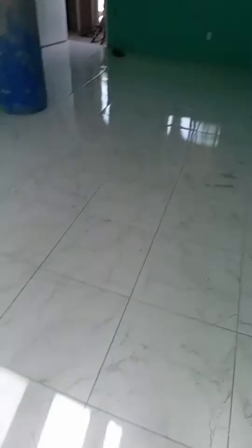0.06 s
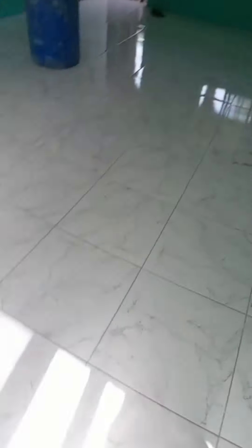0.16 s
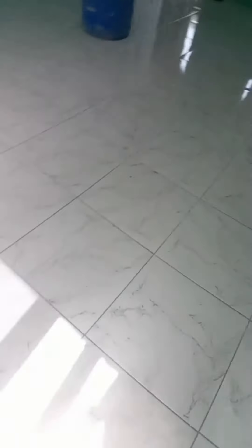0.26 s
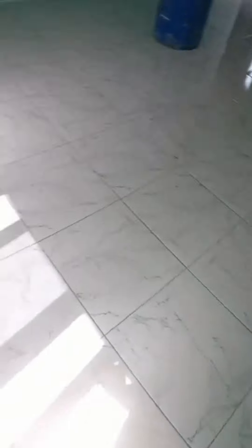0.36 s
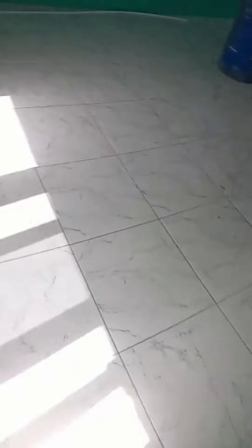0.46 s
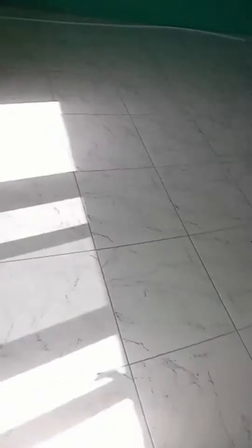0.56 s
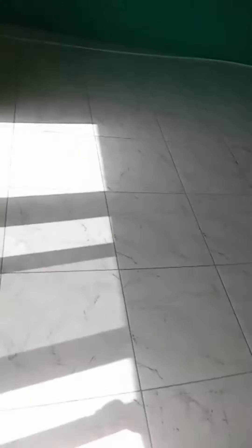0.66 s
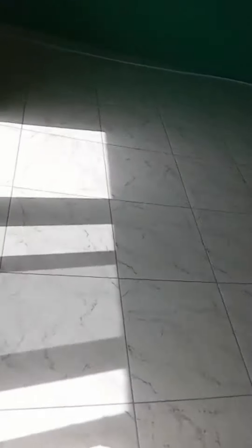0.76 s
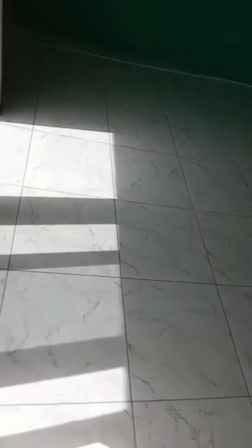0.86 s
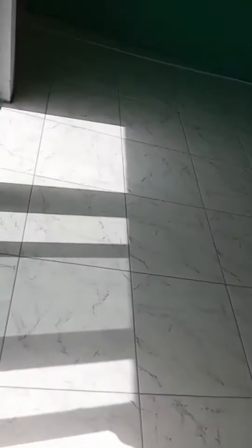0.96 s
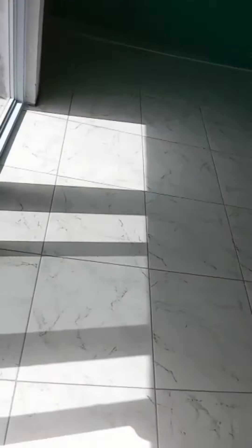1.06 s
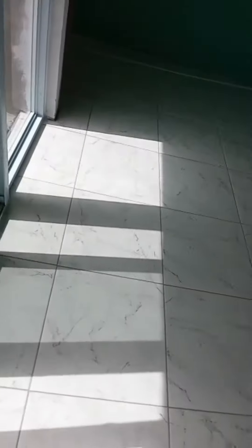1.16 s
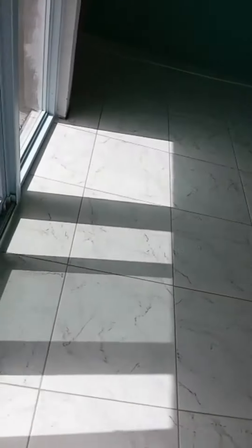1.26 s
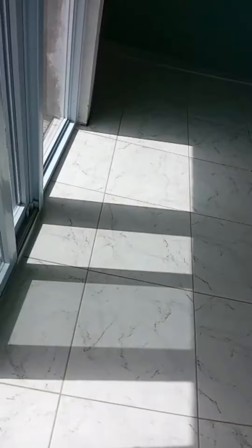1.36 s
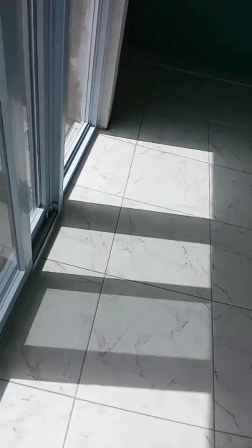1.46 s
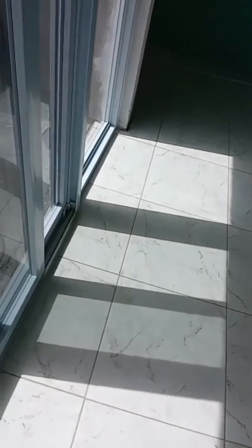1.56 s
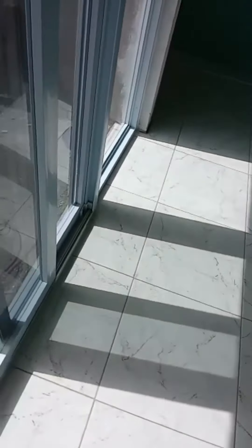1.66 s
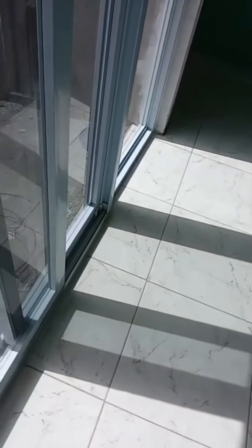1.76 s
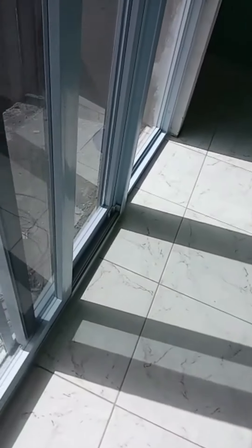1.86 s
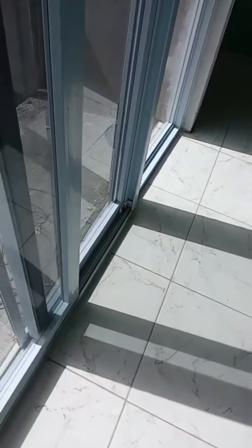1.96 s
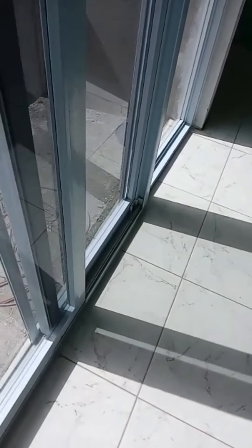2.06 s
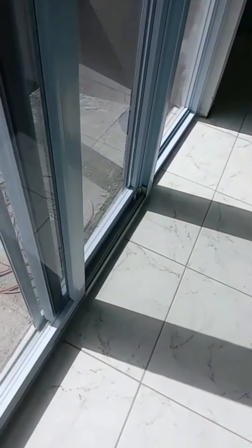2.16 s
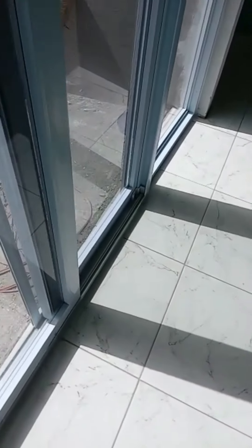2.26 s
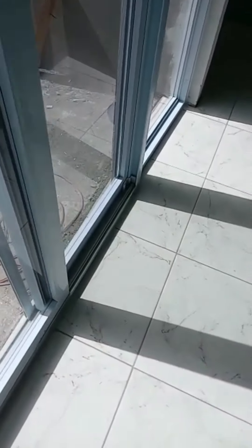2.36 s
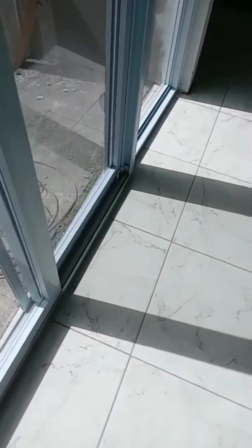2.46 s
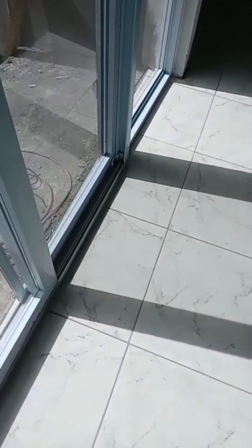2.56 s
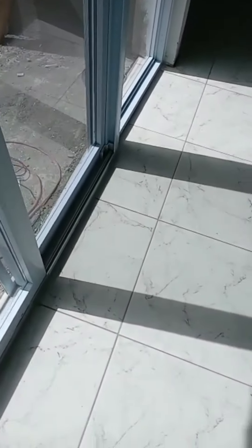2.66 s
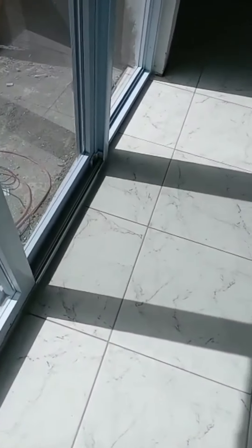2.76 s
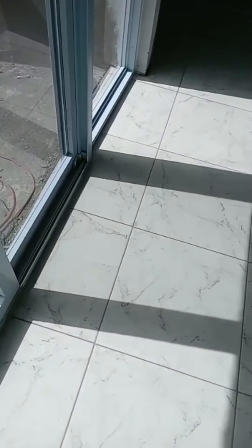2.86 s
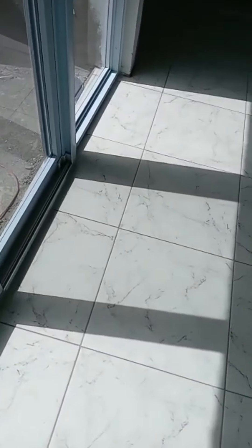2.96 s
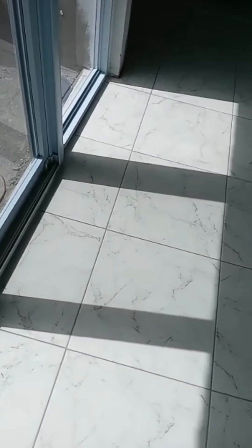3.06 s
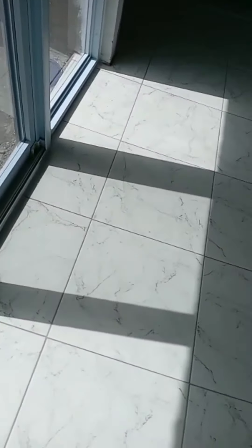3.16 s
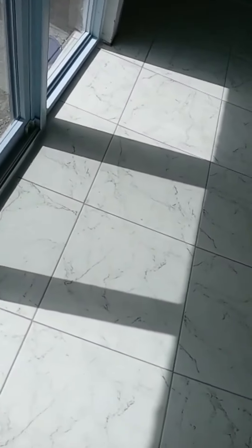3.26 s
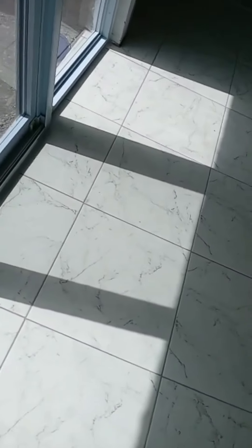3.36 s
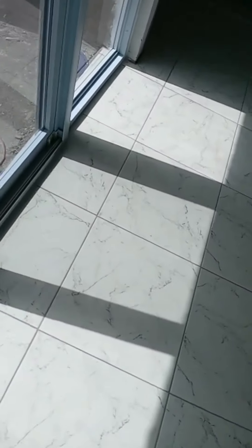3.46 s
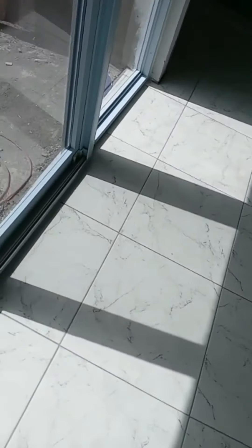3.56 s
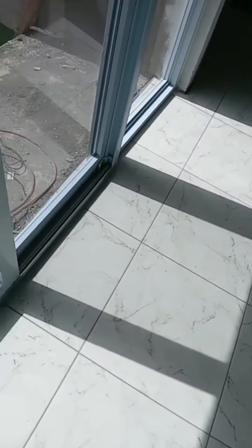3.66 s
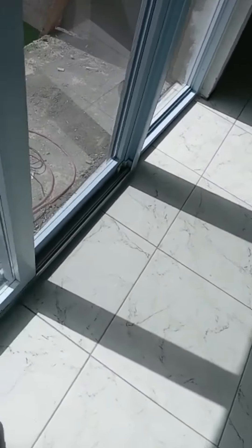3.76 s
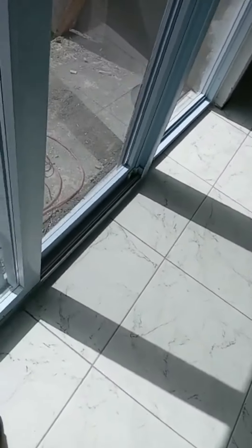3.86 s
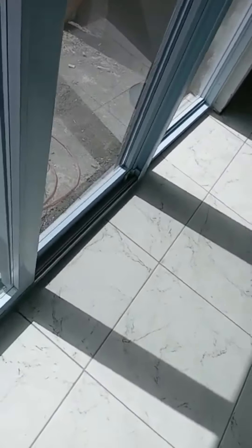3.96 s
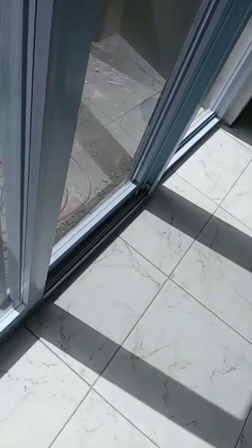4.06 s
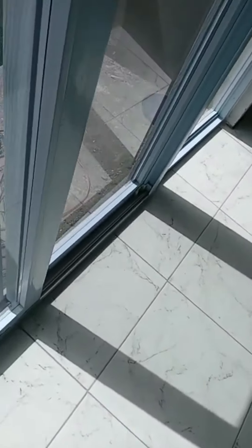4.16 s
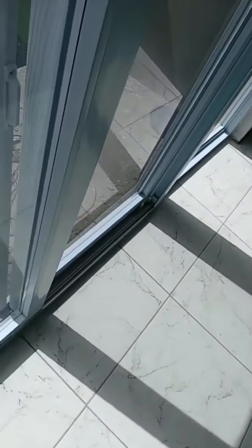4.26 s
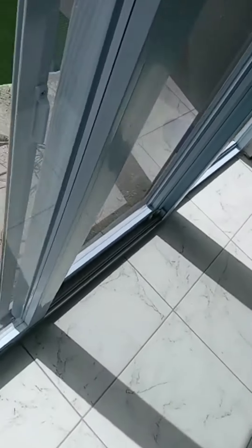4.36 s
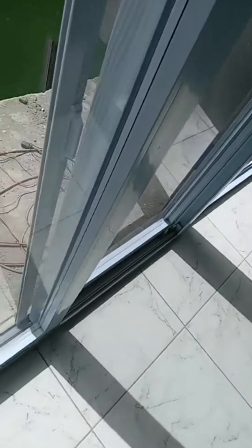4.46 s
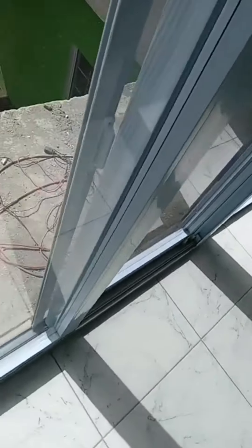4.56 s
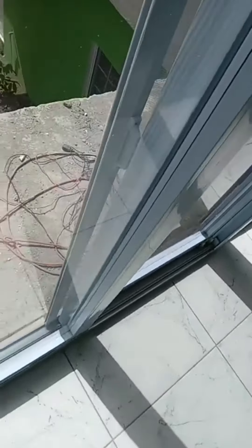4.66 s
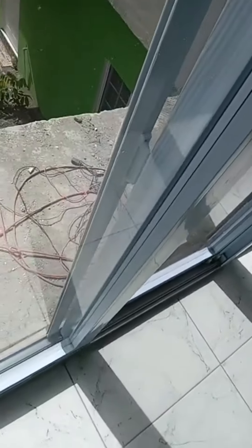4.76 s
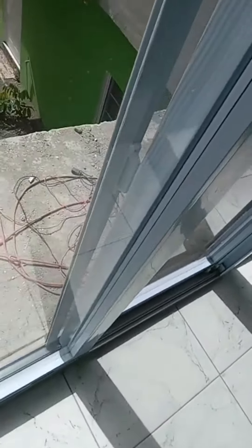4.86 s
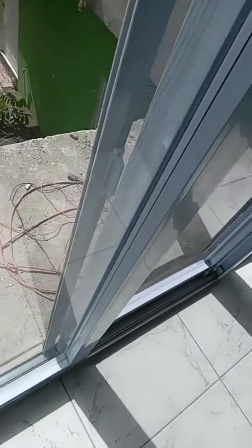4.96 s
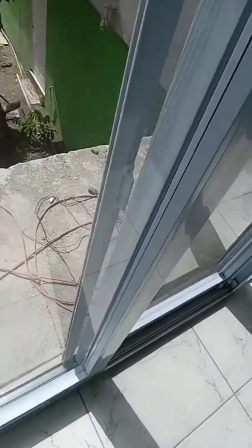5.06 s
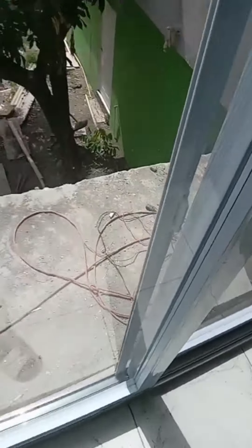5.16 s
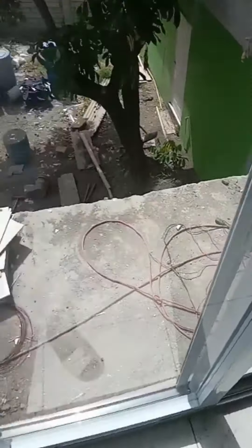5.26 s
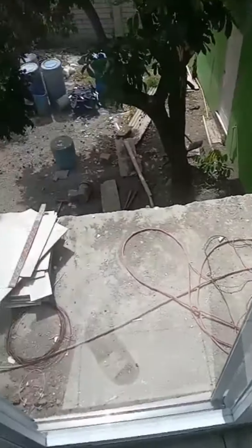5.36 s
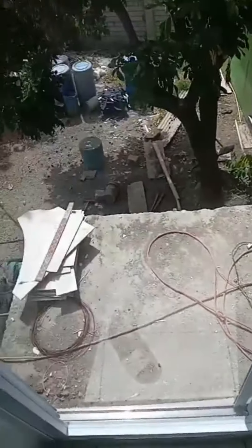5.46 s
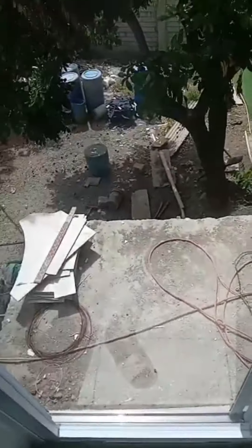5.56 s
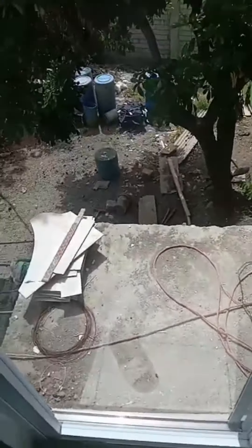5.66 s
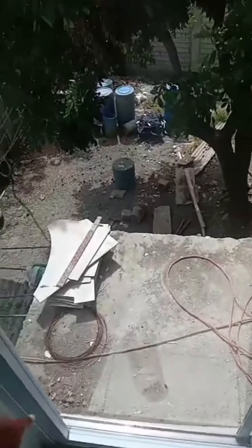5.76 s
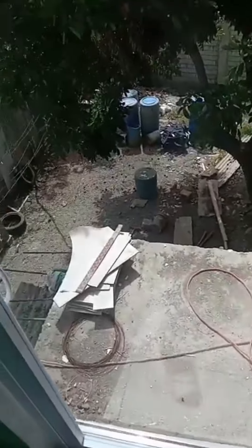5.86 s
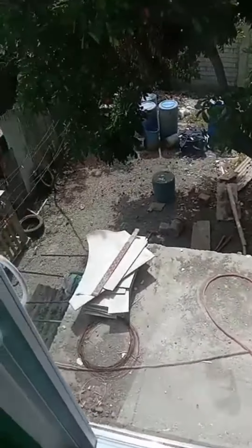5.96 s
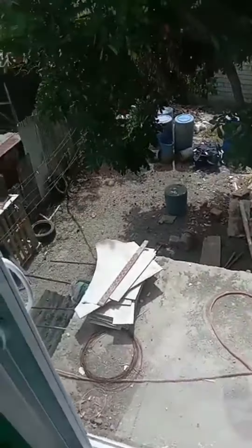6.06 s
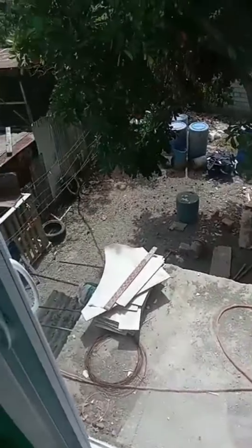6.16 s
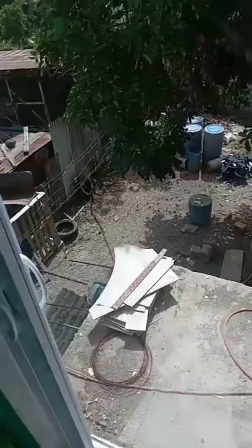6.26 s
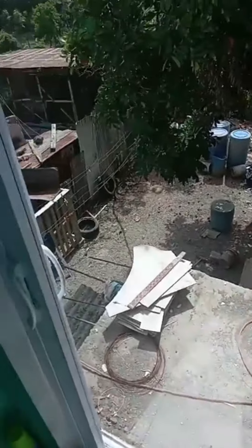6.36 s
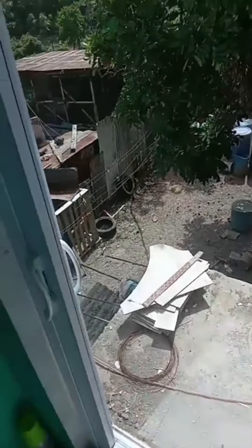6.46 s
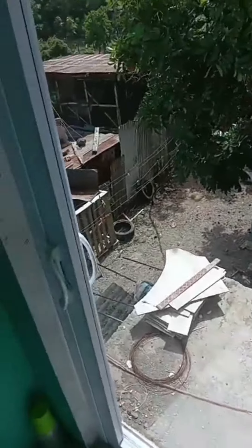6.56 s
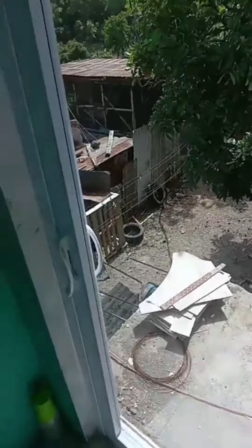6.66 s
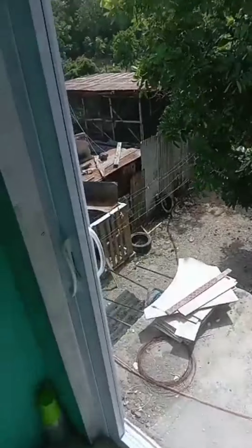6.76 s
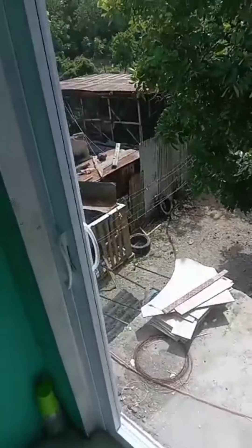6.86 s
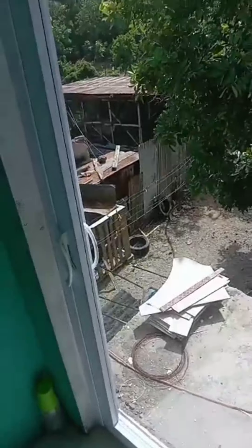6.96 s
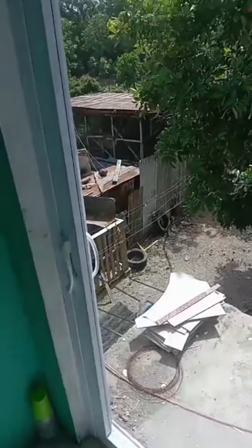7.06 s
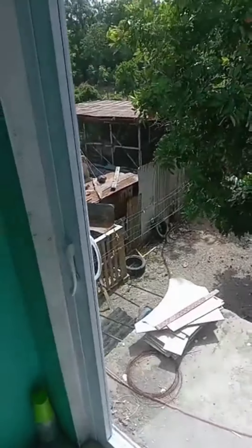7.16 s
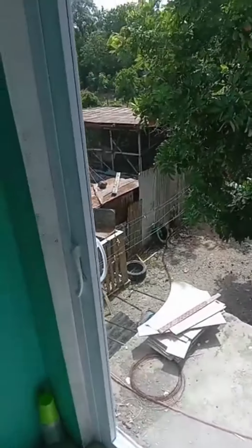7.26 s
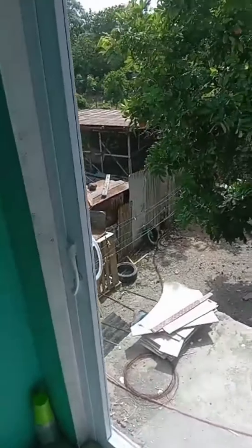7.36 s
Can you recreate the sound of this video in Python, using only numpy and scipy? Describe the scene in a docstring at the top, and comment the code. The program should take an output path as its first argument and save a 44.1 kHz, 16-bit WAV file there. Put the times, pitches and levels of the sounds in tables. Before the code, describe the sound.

Close to a phone in a bare tiled room, a few footstep ticks and soft scuffs come first. A heavy glass door then rolls along its metal track, rumbling with a hissing seal, and hits its stop with a loud boomy bang and small rebounds. Echoes ring out, a latch snaps sharply and rattles, then light handling ticks, sleeve rubs and faint breeze remain.

```python
"""Heavy glass door sliding shut

A heavy glass door rolls along its metal track and bumps to a stop in a bare tiled room, then a latch snaps.
Rollers shake the pane and its seal hisses; blows and latch are broad cracks plus tones that die away.
Feet, hands and sleeves tick, thump and scuff near a phone: shaped puffs and strokes of noise.
Faint hollow tones, whistles, still air and a breeze after the door has shut are noise of different colours.
Random echoes form the room; a noise suppressor and a limiter shape the result.
"""
import sys
import numpy as np
from scipy import signal
from scipy.fft import rfft, irfft
from scipy.io import wavfile
from scipy.ndimage import uniform_filter1d

SR = 44100
rng = np.random.default_rng(int(sys.argv[2]) if len(sys.argv) > 2 else 0)


def volts(x):
    """Linear amplitude factor 10**(x/20) for a level x in dB, scalar or array-like."""
    e = np.asarray(x, float) / 20
    return 10 ** e


def unload_wav(signal):
    """Save mono or channel-first audio to the path in sys.argv[1] as 16-bit WAV at rate SR, clipped to [-1, 1]."""
    wavfile.write(
        sys.argv[1],
        SR,
        np.round(np.clip(np.atleast_2d(signal).T, -1, 1) * 32767).astype(np.int16),
    )


N = 327252  # length in samples

# Levels in these tables are those of the parts, before the mix and the processing in record().
# Colours give only the shape of a spectrum: their levels are relative.

# still air of room and yard, its colour: f/Hz, level/dB
AIR_COLOUR = [(71, -32), (120, -5), (289, -9.5), (436, -17.5), (557, -12.5), (617, -17.5), (757, -17),
              (2070, -29), (6910, -28.5), (8140, -38.5), (13000, -47.5), (15000, -38.5), (16000, -25)]
# still air, its loudness over time: t/s, level/dB
AIR_LEVELS = [(0, -53.5), (.2, -57.5), (2.4, -54), (3.8, -57), (3.93, -59.5), (4.1, -55), (5, -58.5),
              (7.3, -58.5), (7.42, -58)]
# breeze, its colour: f/Hz, level/dB
BREEZE_COLOUR = [(30, -6.5), (60, 6.5), (88, 0.5), (125, -20.5), (300, -14.5), (500, -72)]
# low buffets of wind on the microphone after the door has shut: start t/s, length/s, peak level/dB
BREEZE_BUFFETS = [(4.813, 0.12, -65), (4.994, 0.22, -49), (5.186, 0.12, -55), (5.348, 0.11, -49),
                  (5.487, 0.052, -52), (5.587, 0.25, -54.5), (5.844, 0.2426, -56.5), (6.101, 0.38, -56.5),
                  (6.38, 0.25, -60.5), (6.704, 0.14, -55), (6.885, 0.066, -52)]
# faint hollow tones, whistles and the thin high hiss of two scuffs:
# start t/s, length/s, f/Hz, width/Hz, level/dB
FAINT_TONES = [(2.75, .1, 835, 30, -41), (6.47, .14, 15300, 900, -61), (6.69, .15, 15300, 900, -60),
               (3.79, .07, 630, 40, -62), (5.306, .28, 557, 13, -65), (6.23, .42, 612, 30, -53),
               (6.25, .1, 527, 45, -58), (6.691, .15, 11100, 300, -60), (7.041, 0.22, 593, 28, -52),
               (7.053, 0.12, 690, 19, -59), (7.048, 0.086, 985, 25, -65), (6.15, 0.32, 1908, 25, -69),
               (6.689, 0.22, 4570, 60, -67), (6.74, .12, 5250, 60, -69), (6.72, .1, 812, 20, -65),
               (6.7, .14, 2280, 60, -68), (6.47, .14, 5200, 150, -69), (7.34, 0.14, 1890, 30, -66),
               (7.34, 0.14, 1646, 15, -70)]
# soles and sleeves rubbing, a row a stroke: start t/s, length/s, peak level/dB, lean (under 1 peaks early)
SCUFF_STROKES = [(0.265, 0.26, -52, 0.14), (0.405, 0.26, -57, 1), (0.7, 0.2424, -61.5, 0.52),
                 (3.39, 0.29, -62, 0.81), (3.687, 0.18, -60, 1.25), (4.4, 0.58, -59, 0.5403),
                 (5.919, 0.14, -51, 1.3), (6.015, 0.94, -64.5, 0.63), (6.26, 0.073, -63, 2.3),
                 (6.455, 0.22, -56, 0.62), (6.674, 0.27, -57.5, 0.59)]
# rubbing, its colour: f/Hz, level/dB
SCUFF_COLOUR = [(200, -26), (400, 10.5), (700, -15), (1900, -5.5), (4500, -1.5), (7200, 3), (8300, -12),
                (10500, -7), (12000, -38), (13300, -19), (14300, -13), (15500, -7), (16200, -16.5)]
# ticks of feet, hands and fittings, and the bright top of the door blow and latch snaps:
# t/s, peak level/dB, centre f/Hz, width/Hz, time for the puff to fade 60 dB/s,
# level sent to the room against the near sound/dB
SMALL_TICKS = [(0.258, -43, 1210, 2500, 0.022, 7), (0.266, -41.5, 630, 706, 0.05847, -1),
               (0.59, -34, 2850, 5700, 0.045, -5.5), (0.672, -31.5, 5370, 6240, .039, 0),
               (.673, -38, 15000, 2000, .05, -10), (0.69, -36.5, 716, 308, 0.074, -5.5),
               (0.712, -34.5, 2933, 3720, 0.028, -8), (0.808, -41.5, 6640, 3059, .039, -13),
               (0.965, -45.5, 5640, 3030, 0.03097, 8.5), (1.361, -33.5, 5030, 4000, 0.018, -5),
               (3.005, -32, 5600, 3600, .02, -2), (3.005, -45, 15200, 1200, .015, -30),
               (2.454, -22.5, 15200, 1400, .02, -29.5), (4.041, -32.5, 15200, 1400, 0.02, -24.5),
               (4.062, -35, 15200, 1400, .025, -22.5), (3.986, -44, 2210, 199, 0.028, 0.5),
               (4.21, -33.5, 3000, 5900, 0.055, -18), (4.222, -54, 5000, 4000, 0.0354, -25),
               (4.254, -35.5, 7290, 260, .035, -29), (4.6415, -32.5, 4500, 4000, 0.022, -21),
               (4.645, -50, 2681, 350, 0.02154, -16), (5.109, -33, 3060, 1000, 0.026, -15),
               (5.9067, -44.5, 1368, 350.2, 0.083, -19), (5.908, -42, 2880, 500, 0.023, -25),
               (5.9125, -29, 5900, 2455, 0.022, -8), (5.932, -38, 1000, 2709, .05, 0),
               (6.215, -43, 1220, 220, 0.018, -6.5)]
# dull thumps of feet and of the pane in its track: t/s, f/Hz, rms level/dB
DULL_THUMPS = [(0.588, 284, -55.5), (0.688, 209, -52), (.712, 184, -50.5), (0.738, 185, -50),
               (1.55, 160, -51), (1.575, 140, -57.5), (1.595, 179, -61.5), (2.81, 280, -43),
               (2.97, 800, -68), (2.985, 250, -52.5), (4.059, 160, -56), (4.034, 584, -50),
               (4.208, 530, -56.5), (4.258, 160, -58), (4.643, 850, -61.5), (4.649, 400, -62),
               (4.655, 152, -50), (4.665, 530, -62.5), (4.69, 300, -59), (5.934, 600, -55.5)]
# tones of the rattling latch parts: f/Hz, width/Hz, level/dB
RATTLE_MODES = [(701, 500, -14), (1500, 900, -1), (2942.2, 900, 4.5), (2293, 160, 5), (3480, 90, 1),
                (4270, 273, 6), (4780, 240, 7.5), (5900, 1400, -2), (7150, 390, -8)]
# snaps of the latch: t/s, ring level/dB, crack level/dB
LATCH_SNAPS = [(4.0408, -36, -19.5), (4.0618, -50.5, -21.5), (4.082, -63, -28)]
# modes (natural tones) of the latch: f/Hz, level/dB, time to fade 60 dB/s
LATCH_MODES = [(585, 1.5, 0.041), (916, -28.5, 0.0379), (1214, -13.5, 0.23), (1464, -5, 0.1),
               (1843, -2, 0.088), (2120, 4, 0.039), (2310, 2, 0.069), (2180, -23, 0.813), (3460, -26, 0.9),
               (3520, -21, 1.7), (3540, -12.5, 0.96), (4114, -20, 0.832), (3610, -4, 0.0524),
               (4471.4, -7, 0.016), (4710, 6.5, 0.019), (6004, -24, 0.0088), (6640, -6, 0.0074),
               (7066, 11.5, 0.03)]
# crack of small metal parts, its colour: f/Hz, level/dB
LATCH_COLOUR = [(300, -46), (1000, -5), (2200, -13), (3500, 1), (5000, -2.5), (7200, 4.5), (8300, -12.5),
                (10500, -9), (12800, -25.5), (15300, -8), (16000, -20.5)]
# the door meets its stop in blows, rebounds and settles: t/s, crack level/dB, thud level/dB
DOOR_BLOWS = [(2.435, -17.5, -60), (2.4385, -14.5, -38), (2.4448, -23, -36.5), (2.4497, -13, -39),
              (2.4515, -11, -34.5), (2.4545, -7.5, -29), (2.4607, -32, -32.5), (2.492, -25, -37),
              (2.543, -29, -34.5), (2.615, -25.5, -41.5), (2.69, -39, -47)]
# modes of the heavy door: f/Hz, level/dB, time to fade 60 dB/s
DOOR_MODES = [(27.647, 1, .4), (46.9, 0, 0.29), (84.7, 5.5, 0.45), (132, 1, 0.14), (161, 6, 0.15),
              (196, 0.5, 0.09), (232.7, 0.5, 0.18), (282.3, 9, 0.19), (344.5, 2.5, 0.12), (410.5, 2, 0.16),
              (500, -3, 0.05), (616, -4.5, 0.08), (698, 0.5, 0.082), (802, 0, 0.082), (880, 5, 0.099),
              (968, -1.5, 0.062), (1183, 2, 0.042), (1317, -2, 0.034), (1477, 0, 0.03), (1708, -0.5, 0.025),
              (1915, -2, 0.017), (2450, 0.5, 0.017)]
# crack of a hard blow, its colour: f/Hz, level/dB
BLOW_COLOUR = [(60, -16), (300, 5), (1000, 3), (1500, 0), (2400, -2), (3600, -1), (4700, -2), (7200, -4),
               (8500, -20.5), (10500, -17.5), (12800, -45), (14000, -16), (15300, -13), (16000, -36.5)]
# squeaks of the seal: start t/s, length/s, f/Hz, level/dB
SEAL_SQUEAKS = [(1.644, 0.047, 11650, -49), (1.688, 0.043, 11430, -49.5), (1.72, .03, 11800, -64),
                (1.855, 0.041, 11580, -49), (1.921, 0.02541, 9900, -45.5)]
# hiss of the seal, its colour: f/Hz, level/dB
SEAL_COLOUR = [(530, -35), (900, -12), (1570, -11.5), (2350, -6), (2600, -9), (2850, -9.5), (4400, -6),
               (5350, -7.5), (6110, -0.5), (7230, -2), (8250, -11), (11400, -11.5), (13300, -36),
               (14300, -12), (15200, -4.5), (16000, -11)]
# modes of the pane rung by the rollers: f/Hz, width/Hz, level/dB
PANE_MODES = [(160, 51, -19), (320, 67, 5.5), (400, 27, 6), (500, 160, 5.5), (600, 36, 5), (699, 100, 1),
              (775, 54, -0.5), (880, 24, -14), (1000, 110, 1)]
# the roll over time: t/s, rumble level/dB, seal hiss level/dB, centre of the rumble f/Hz (higher at speed)
ROLL_COURSE = [(0.9, -81.5, -123, 250), (1.05, -67, -52.5, 247.8), (1.26, -52.5, -46.5, 290),
               (1.3, -46.5, -45.5, 330), (1.37, -42, -43, 467), (1.4, -42.5, -43.5, 514),
               (1.45, -42, -40.5, 632.1), (1.5, -41.5, -40.5, 666), (1.55, -39.5, -39, 596),
               (1.61, -41, -40, 600), (1.64, -40, -40.5, 644), (1.7, -41.5, -38, 600),
               (1.74, -38, -39.5, 594), (1.82, -40.5, -39, 570), (1.9, -39, -39, 500),
               (1.97, -43, -41, 580), (2.035, -44.5, -41, 580), (2.06, -55, -39.5, 480),
               (2.09, -43.5, -42, 420), (2.16, -62, -41.5, 444), (2.3, -53, -40.5, 450),
               (2.415, -52, -44.5, 454)]
# how long the room's echoes last: f/Hz, time to fade 60 dB/s
ECHO_TIMES = [(80, 1.34), (250, 1.14), (1000, 1.31), (2500, 1.454), (5000, 1.2), (8000, 1.21), (11000, 1.5),
              (15000, 0.63)]
# colour of the echoes, weakest near 14 kHz: f/Hz, level/dB
ECHO_COLOUR = [(8000, 0), (12000, -3.5), (14000, -14.5), (16000, 3)]
# level of each band that the suppressor compares with: f/Hz, level/dB
SUPPRESSOR_LEVELS = [(80, -54), (150, -45.5), (300, -47.5), (1000, -57), (2000, -66.5), (7000, -56.5),
                     (9000, -66), (15000, -60)]


def read(points, hz):
    """Reads a spectrum between its points, on a log-frequency axis."""
    f, value = np.transpose(points)
    return np.interp(np.log(hz + 1), np.log(f + 1), value)


def curve(rows, edge=-120):
    """Columns of a table at every sample; outside it they take the edge value."""
    s, *columns = np.transpose(rows)
    return [np.interp(np.arange(N) / SR, s, c, edge, edge) for c in columns]


def evened(x):
    """Scales a sound to an rms of 1."""
    return x / np.sqrt(np.mean(x ** 2) + 1e-20)


def add(mix, s, sound):
    """Mixes a sound in at time s, in seconds."""
    part = mix[round(s * SR):][:len(sound)]
    part += sound[:len(part)]


def noise(points, patchy_db):
    """Noise of a given colour, from random short spectra with patches that drift in level."""
    a, b, patches = rng.standard_normal((N // 256 + 5, 513, 3)).T
    patches = uniform_filter1d(uniform_filter1d(patches, size=10, axis=0), size=8, axis=1)
    colour_db = read(points, np.fft.rfftfreq(1024, 1 / SR))[:, None]
    spectra = (a + 1j * b) * volts(colour_db + patchy_db * evened(patches))
    return evened(signal.istft(spectra, nperseg=1024, noverlap=768)[1][:N])


def resonate(x, hz, width):
    """A resonance of gain 1: shift the pitch to zero, smooth, and shift back."""
    turn = np.exp(2j * np.pi * hz * np.arange(len(x)) / SR)
    r = np.exp(-np.pi * width / SR)
    return 2 * (turn * signal.lfilter([1 - r], [1, -r], x / turn)).real


def ring(modes, spread):
    """Dying modes, struck at a slightly different spot each time (spread in dB)."""
    t = np.arange(SR) / SR
    out = np.zeros(SR)
    for (hz, db, t60), spot in zip(modes, rng.standard_normal(len(modes))):
        out += volts(db + spread * spot - 60 * t / t60) * np.sin(2 * np.pi * hz * t)
    return out


def burst(t60, size=4000):
    """A puff of noise that fades by 60 dB in t60 seconds."""
    return rng.standard_normal(size) * volts(-60 * np.arange(size) / SR / t60)


def onset(samples, size=4000):
    """A quick smooth start, with its time constant in samples."""
    return 1 - np.exp(-np.arange(size) / samples)


def crack(t60, colour=BLOW_COLOUR):
    """A broad snap: the timing of a dying puff of noise with the smooth colour of a hard blow."""
    z = rfft(burst(t60, size=8192))
    even = z * (np.mean(abs(z)) / abs(z)) ** .9  # flattens most of the random bumps in the spectrum
    return irfft(even * volts(read(colour, np.fft.rfftfreq(8192, 1 / SR))))[:4000]


def swell(seconds, lean=0.92):
    """A rise and fade; a lean under 1 peaks early, over 1 late."""
    u = np.linspace(0, 1, round(seconds * SR))
    return np.sin(np.pi * u ** lean)


def tail():
    """Room echoes: sparse taps of random sign, each band dying at its own speed."""
    taps = np.zeros(2 * SR)
    at = np.arange(300, 2 * SR - 20, 20) + rng.integers(0, 20, (2 * SR - 301) // 20)
    taps[at] = rng.choice([-1., 1.], len(at)) * (1 - np.exp(-at / SR / 0.016))  # echoes thicken at first
    hz, t, z = signal.stft(taps, SR, nperseg=512)
    level_db = read(ECHO_COLOUR, hz)[:, None] - 60 * t / read(ECHO_TIMES, hz)[:, None]
    out = signal.istft(z * volts(level_db), SR, nperseg=512)[1]
    return out / np.linalg.norm(out)


def room(x):
    """Moments a few ms apart are shared differently among three random tails: a smoother echo colour."""
    turn = np.pi * np.arange(N) / SR / .006  # the sharing repeats every 6 ms
    wet = np.zeros(N)
    for k in range(3):
        share = np.sqrt(2 / 3) * abs(np.cos(turn + k * np.pi / 3))
        wet += signal.fftconvolve(x * share, tail())[:N]
    return wet


def air():
    """Steady hush: the still air of room and yard as coloured noise."""
    return volts(curve(AIR_LEVELS)[0]) * noise(AIR_COLOUR, patchy_db=0.8)


def breeze():
    """Low noise of moving air on the microphone, always faintly there and swelling with each buffet."""
    level = np.full(N, volts(-63.5))
    for s, seconds, db in BREEZE_BUFFETS:
        add(level, s, volts(db) * swell(seconds, lean=0.98) ** 1.1)
    return level * noise(BREEZE_COLOUR, patchy_db=0.0)


def tones():
    """Faint tones and thin hiss: narrow bands of noise at fixed pitch, with their level changes calmed."""
    out = np.zeros(N)
    for s, seconds, hz, width, db in FAINT_TONES:
        shape = swell(seconds, lean=0.62)
        fuzz = resonate(rng.standard_normal(SR), hz, width)
        fuzz = evened(resonate(fuzz, hz, 3 * width))
        fuzz /= (uniform_filter1d(fuzz ** 2, size=400) + .05) ** 0.18  # calms the changes in level
        add(out, s, volts(db) * shape * evened(fuzz)[-len(shape):])
    return out


def scuffs():
    """Rubbing soles and sleeves: hiss under each stroke, easing in and out."""
    stroke = np.zeros(N)
    for s, seconds, db, lean in SCUFF_STROKES:
        add(stroke, s, volts(db) * swell(seconds, lean) ** 1.34)
    return stroke * noise(SCUFF_COLOUR, patchy_db=1.5)


def ticks():
    """Each is a puff through a resonance plus a crack; returns near and room-bound sound."""
    near, far = np.zeros(N), np.zeros(N)
    for s, db, hz, width, t60, room_db in SMALL_TICKS:
        puff = burst(t60) * onset(30)
        body = evened(resonate(resonate(puff, hz, width), hz, width))
        tick = body + width / 9000 * evened(crack(4.7 * t60))  # wider ticks get more crack
        tick *= volts(db) / abs(tick).max()
        add(near, s, tick)
        add(far, s, volts(room_db) * tick)
    return near, far


def thumps():
    """Dull thumps: a longer puff sent twice through one low resonance."""
    out = np.zeros(N)
    rise = onset(0.0012 * SR)
    for s, hz, db in DULL_THUMPS:
        thump = resonate(resonate(rise * burst(0.22), hz, 100), hz, 100)
        add(out, s, volts(db) * evened(thump))
    return out


def rattle():
    """Loose latch parts shake on after the snap: dense small knocks ring their tones."""
    start_s, length_s, level_db, knocks_per_s = 4.06, 0.35, -46, 4800
    shape = swell(length_s, lean=0.53)
    knocks = rng.standard_normal(len(shape)) * (rng.random(len(shape)) < knocks_per_s / SR)
    knocks = signal.sosfilt(signal.butter(8, 7700, fs=SR, output="sos"), knocks)  # softens the top
    parts = sum(volts(db) * evened(resonate(knocks, hz, width)) for hz, width, db in RATTLE_MODES)
    out = np.zeros(N)
    add(out, start_s, volts(level_db) * shape * evened(parts))
    return out


def latch():
    """Metal parts snap together: each snap is a set of dying modes and a broad crack."""
    out = np.zeros(N)
    for s, ring_db, crack_db in LATCH_SNAPS:
        add(out, s, volts(ring_db) * ring(LATCH_MODES, spread=0.87) * onset(30, SR))
        add(out, s, volts(crack_db) * crack(0.041, LATCH_COLOUR) * onset(40))
    return out


def bump():
    """Each blow is a broad crack and the slower boom of the pane; returns both."""
    cracks, boom = np.zeros(N), np.zeros(N)
    for s, crack_db, thud_db in DOOR_BLOWS:
        add(cracks, s, volts(crack_db) * crack(0.023))
        slow_start = onset(150, SR)  # the pane is heavy
        add(boom, s, volts(thud_db) * ring(DOOR_MODES, spread=3.76) * slow_start)
    return cracks, boom


def squeaks():
    """Short squeaks of the seal: noise through a very narrow resonance."""
    out = np.zeros(N)
    for s, seconds, hz, db in SEAL_SQUEAKS:
        shape = swell(seconds)
        add(out, s, volts(db) * shape * evened(resonate(rng.standard_normal(len(shape)), hz, 60)))
    return out


def pane_rumble(centre_hz):
    """Grit under the rollers shakes the pane: random knocks ring its modes, most near the centre."""
    reach_octaves, wander_db, wander_s, knocks_per_s = .85, 2, .08, 4000
    whine_hz, whine_width_hz, whine_db = 2630, 170, -10.5  # a thin band of the frame sings along
    strength = volts(np.minimum(rng.exponential(1, N), 5))
    grit = strength * (rng.random(N) < knocks_per_s / SR) * rng.choice([-1, 1], N)
    pane, power, span = 0, 0, round(wander_s * SR)
    for hz, width, db in PANE_MODES:
        # each mode comes and goes as the rollers move on
        wander = evened(uniform_filter1d(uniform_filter1d(rng.standard_normal(N), span), span))
        octaves_off = np.log2(hz / np.maximum(centre_hz, 100))
        gain = volts(db - 8 * (octaves_off / reach_octaves) ** 2 + wander_db * wander)
        pane = pane + gain * evened(resonate(rng.permutation(grit), hz, width))
        power = power + gain ** 2
    whine = volts(whine_db) * evened(resonate(grit, whine_hz, whine_width_hz))
    return pane / np.sqrt(power) + whine


def roll():
    """The rolling door: the pane rumbles while the seal hisses and squeaks along the frame."""
    rumble_db, hiss_db, centre_hz = curve(ROLL_COURSE)
    rumble = volts(rumble_db) * pane_rumble(centre_hz)
    hiss = volts(hiss_db) * noise(SEAL_COLOUR, patchy_db=0.8)
    return rumble + hiss + squeaks()


def scene():
    """All sources, near and through the room."""
    rolling, (cracks, boom), snap = roll(), bump(), latch()
    (near, far), dull = ticks(), thumps()
    to_room = volts(-10.5) * rolling + volts(1.0) * (cracks + boom) + volts(-6.5) * snap
    to_room += far + volts(-11.5) * dull
    direct = volts(-6.0) * rolling + cracks + boom + snap + near + dull
    background = rattle() + scuffs() + tones() + air() + breeze()
    return (direct + room(to_room) + background)[None]


def suppress(x):
    """A noise suppressor: strong bands are lifted by up to 7.9 dB, quiet ones stay down."""
    hz, t, z = signal.stft(x, SR, nperseg=512, noverlap=384)
    power = uniform_filter1d(uniform_filter1d(abs(z) ** 2, size=9, axis=0), size=9, axis=1)
    over_db = 10 * np.log10(power + 1e-14) - read(SUPPRESSOR_LEVELS, hz)[:, None]
    # its idea of the noise creeps up under a lasting sound, over about 0.32 s
    keep = np.exp(-128 / SR / 0.32)
    creep_db = signal.lfilter([1 - keep], [1, -keep], np.maximum(over_db + 9.5, 0))
    over_db += 5.5 - .5 * creep_db
    opened = 1 / (1 + np.exp(-np.clip(over_db / 2.5, -30, 30)))  # 0 shut, 1 open
    return signal.istft(z * volts(7.9 * opened), SR, nperseg=512, noverlap=384)[1][:N]


def limit(x):
    """A limiter: takes 0.56 dB off for each dB that the held level is above -18 dB."""
    level_db = 10 * np.log10(abs(uniform_filter1d(x ** 2, size=600)) + 1e-12)
    fall = np.arange(N) * 60. / SR  # after a peak the held level falls 60 dB a second
    held_db = np.maximum.accumulate(level_db + fall) - fall
    excess_db = np.maximum(held_db + 18.0, 0)
    return x / volts(0.56 * uniform_filter1d(excess_db, size=300))


def low_pass(x):
    """Removes everything above the highest recorded frequency."""
    return signal.sosfilt(signal.butter(12, 17000, fs=SR, output="sos"), x)


def record(dry):
    """The microphone drops deep bass; suppressor and limiter follow, then the top treble is cut."""
    x = signal.sosfilt(signal.butter(3, 72, "high", fs=SR, output="sos"), dry[0])
    x = limit(suppress(x))
    treble_cut = signal.firwin(255, 15900, window=("kaiser", 5), fs=SR)
    x = signal.oaconvolve(x, treble_cut, "same")
    return low_pass(x[None])


dry = scene()
out = record(dry)
unload_wav(out)
```